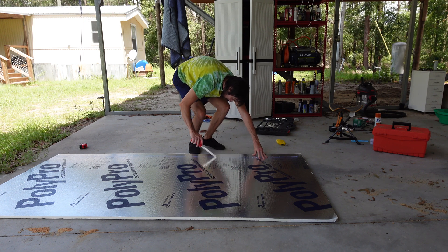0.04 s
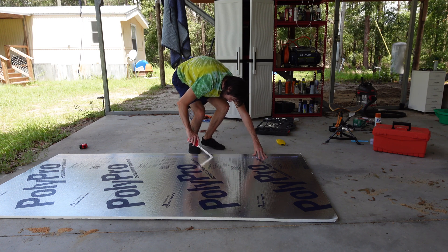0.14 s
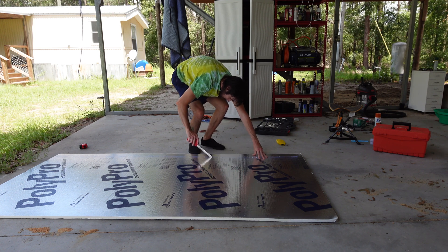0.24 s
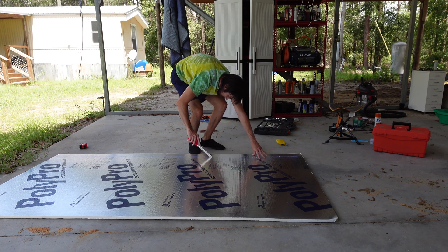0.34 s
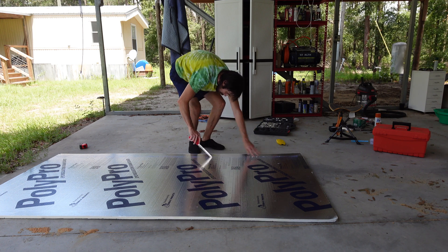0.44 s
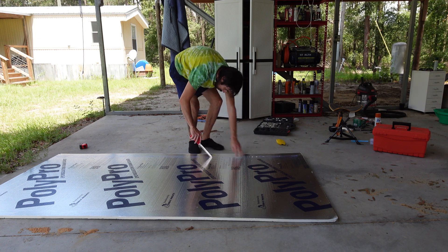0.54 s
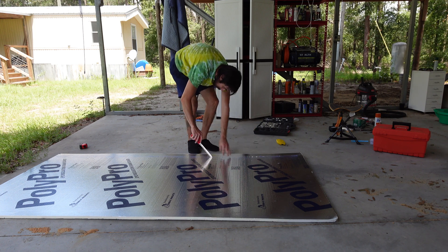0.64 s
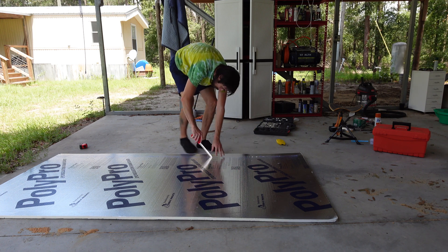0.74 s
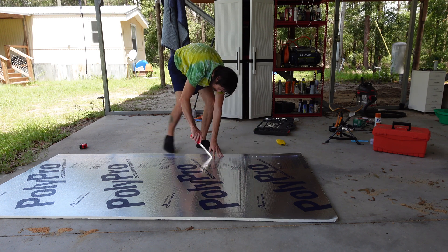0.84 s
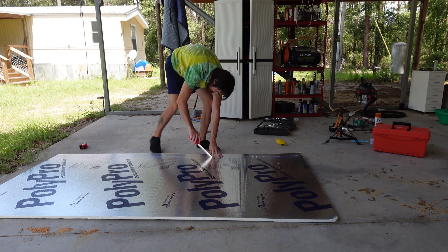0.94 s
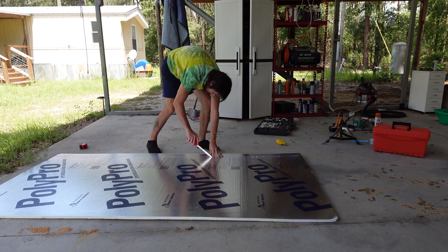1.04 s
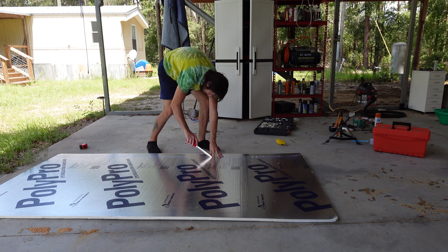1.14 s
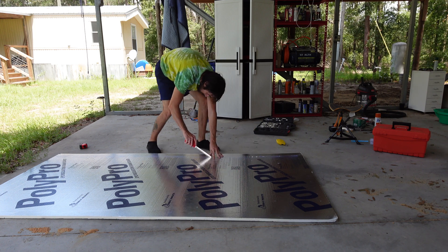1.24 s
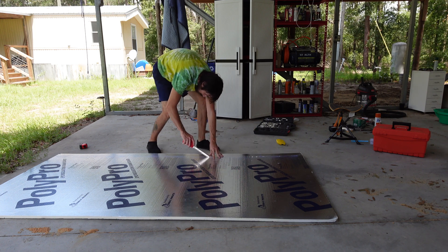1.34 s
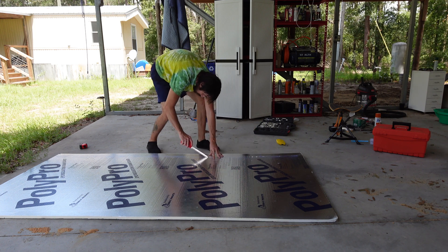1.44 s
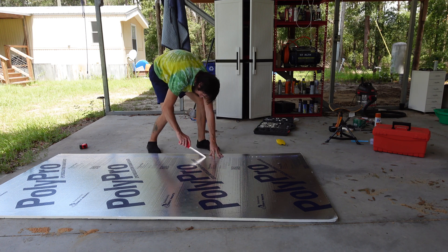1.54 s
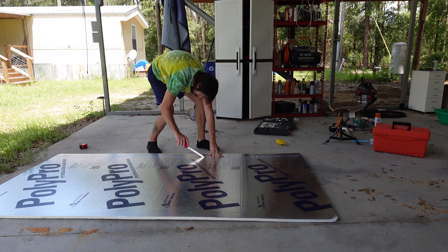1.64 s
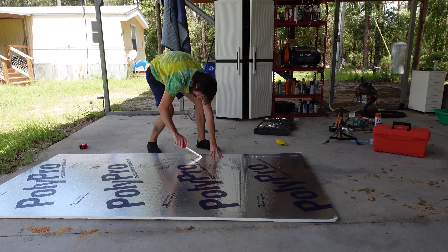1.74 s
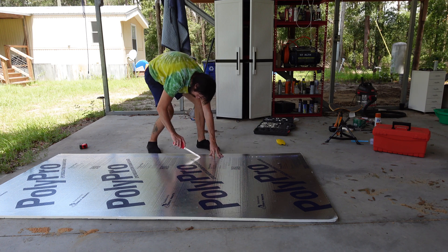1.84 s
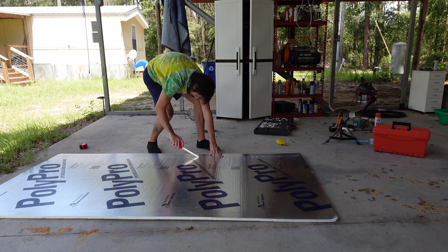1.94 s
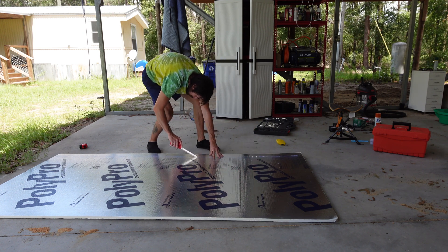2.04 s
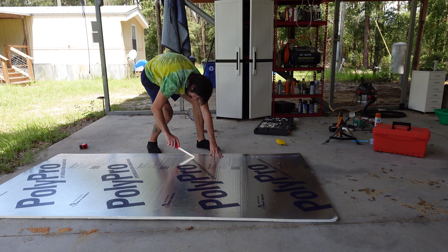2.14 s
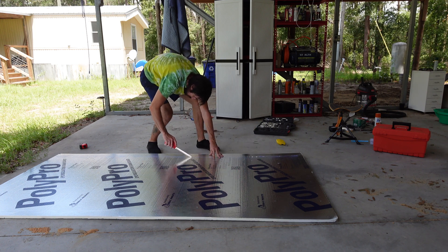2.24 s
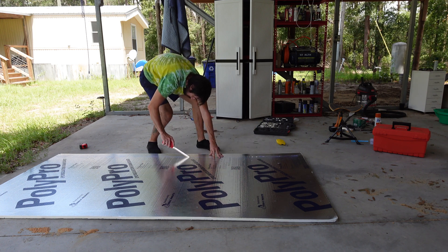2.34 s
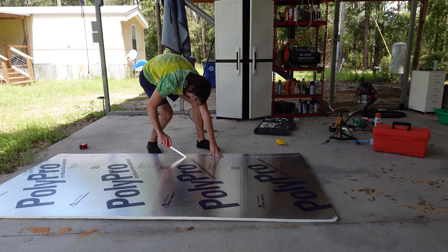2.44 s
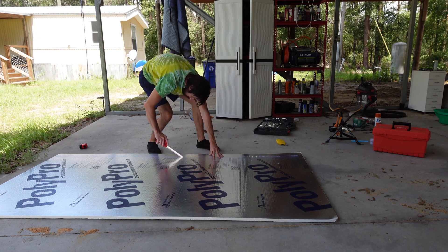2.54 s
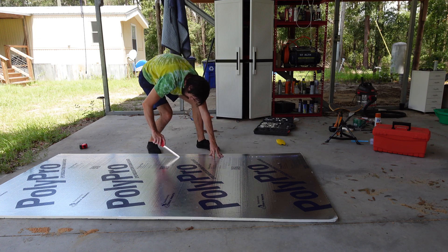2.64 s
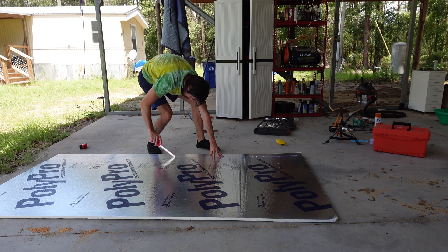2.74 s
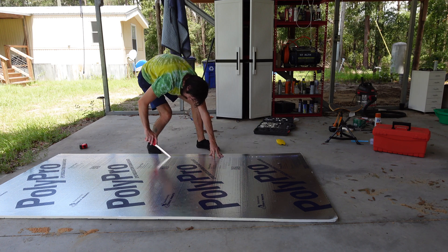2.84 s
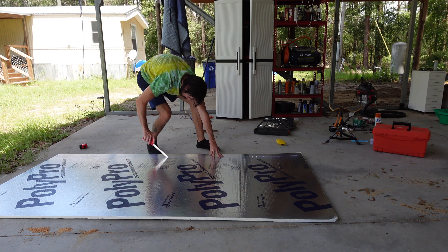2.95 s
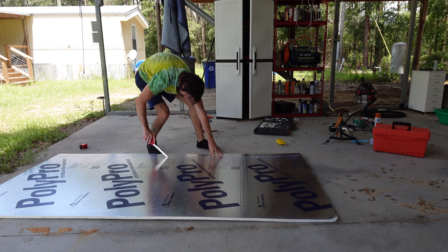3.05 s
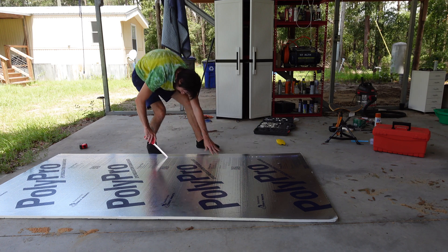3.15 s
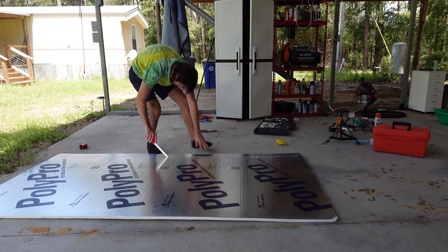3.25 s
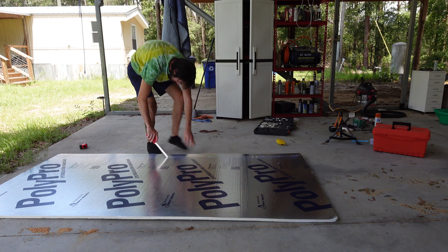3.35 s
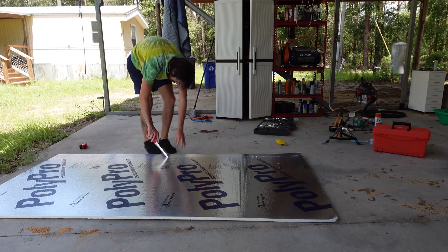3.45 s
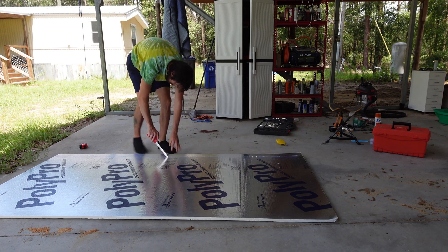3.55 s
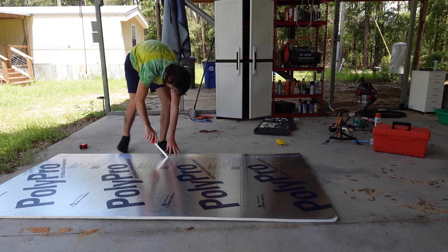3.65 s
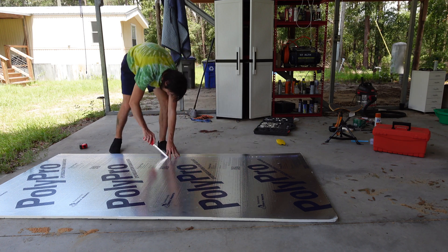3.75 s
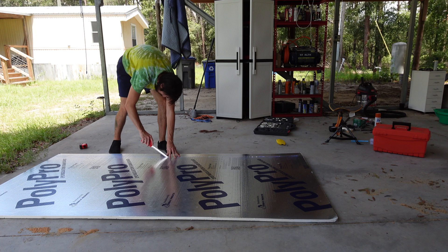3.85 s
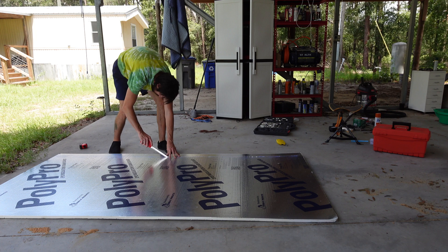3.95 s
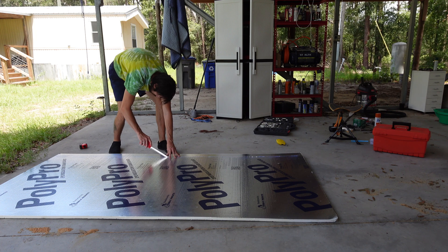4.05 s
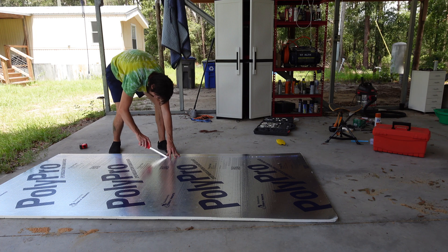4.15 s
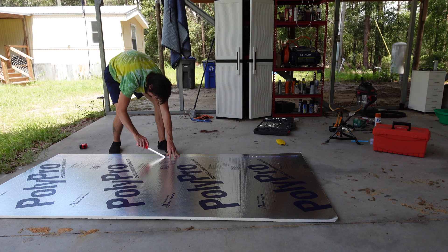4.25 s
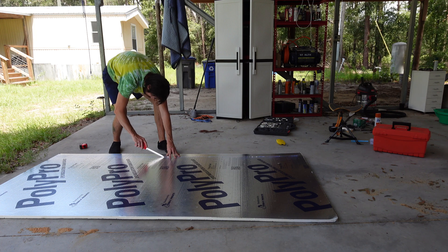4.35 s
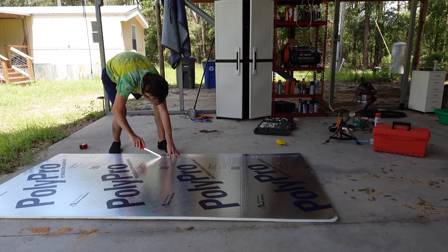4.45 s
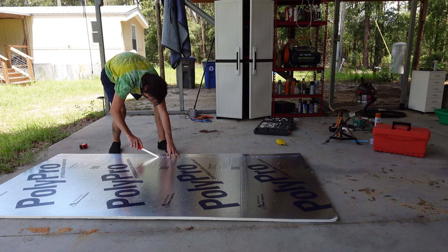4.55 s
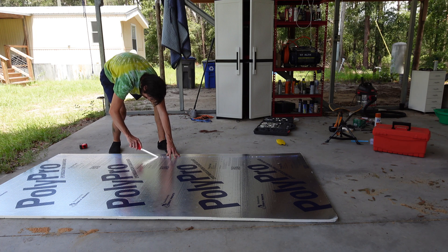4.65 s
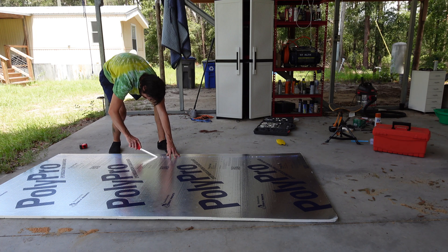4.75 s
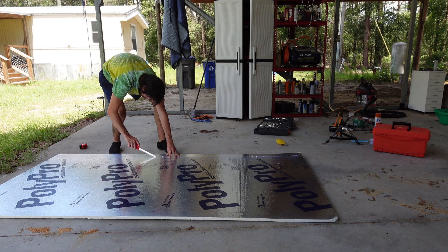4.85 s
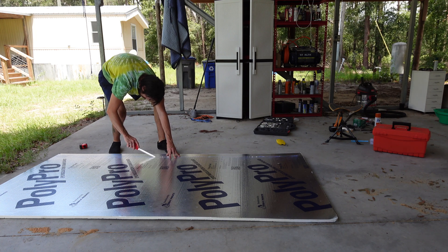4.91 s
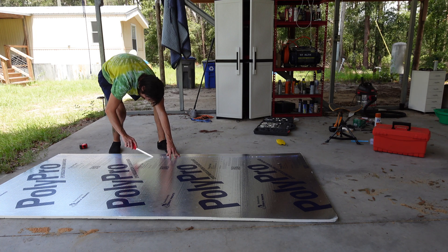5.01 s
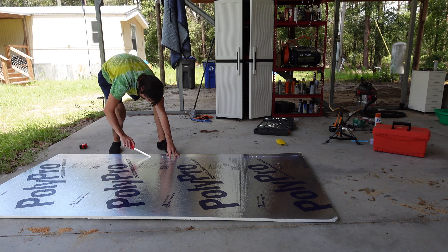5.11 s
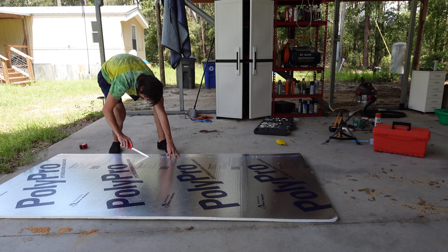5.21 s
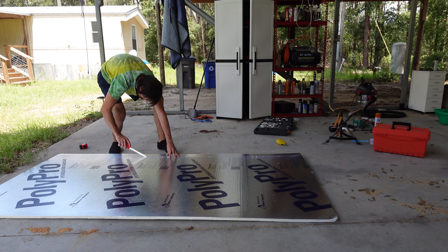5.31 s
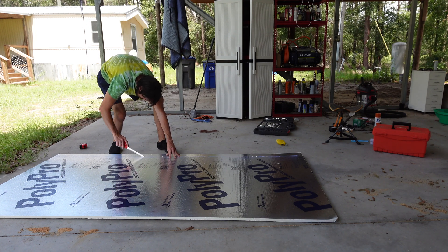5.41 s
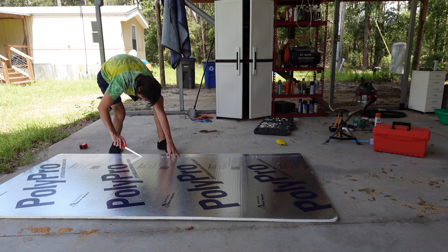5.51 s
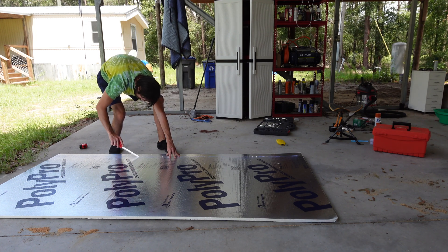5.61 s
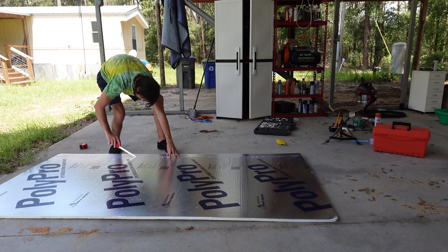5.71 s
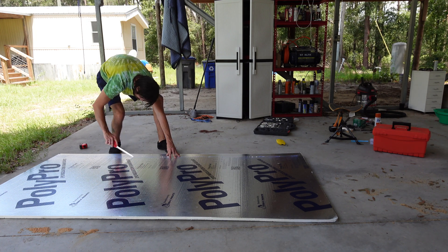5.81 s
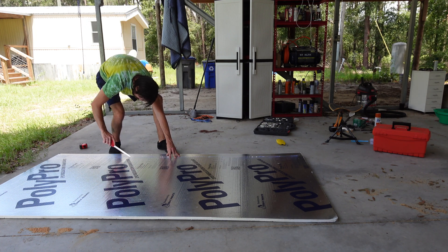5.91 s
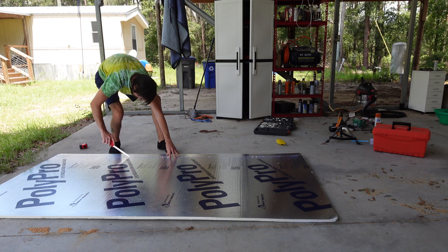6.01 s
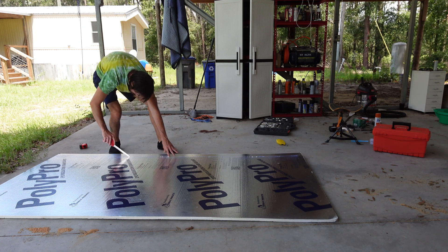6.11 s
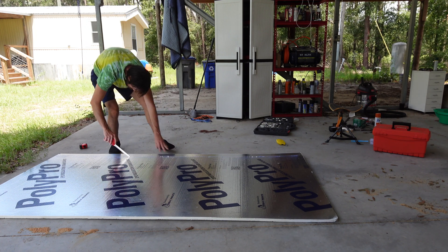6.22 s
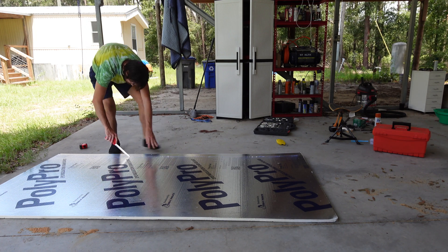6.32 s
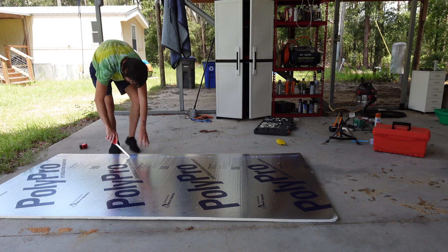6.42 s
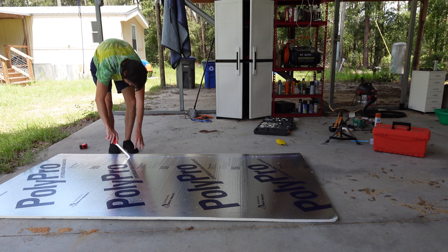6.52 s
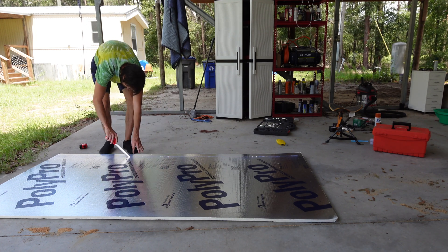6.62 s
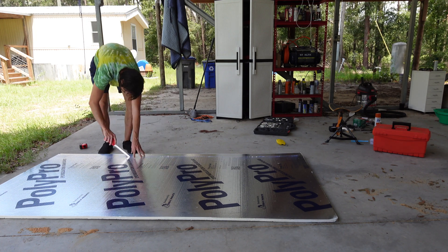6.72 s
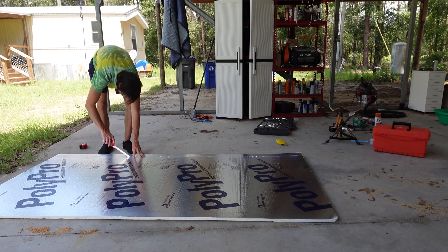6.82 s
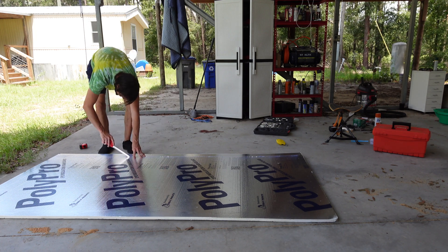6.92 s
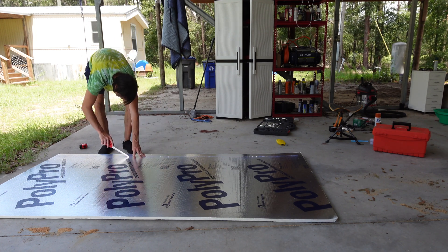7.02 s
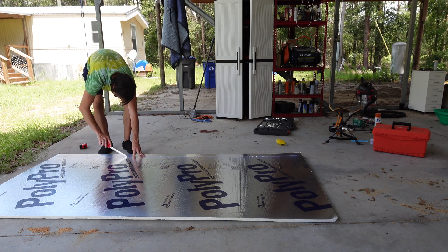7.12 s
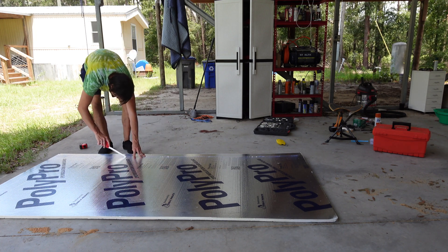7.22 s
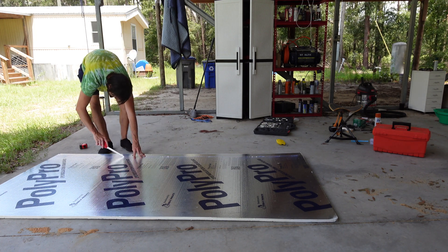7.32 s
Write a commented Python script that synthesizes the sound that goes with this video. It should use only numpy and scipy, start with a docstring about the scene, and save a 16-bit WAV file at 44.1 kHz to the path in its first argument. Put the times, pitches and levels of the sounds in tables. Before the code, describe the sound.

In an open garage, a few metres from the microphone, a blade already mid-cut rips briefly through foil-faced foam board. Gritty shoe scuffs follow, then a long raspy stroke, a pause with soft taps and scuffs, two close strokes, more shuffling, and a last short cut. Foil crackles and sharp little snaps pepper the cuts; tree hiss and insects continue behind.

```python
"""A blade is heard mid-cut in foil-faced foam board on an open garage's floor, first of five strokes, a few metres off.
Fractures make the facing fizz, the foam rasp and the board drum: more with pressure, drumming also as each cut lengthens.
Snags are short noise bursts; foil crackles, clothes-like dull rustle, soft taps and gritty shoe scuffs are shaped noise.
Outside, filtered noise makes low air, hissing trees and insects whose chorus dips, then slowly swells."""
import sys
import numpy as np
from scipy import signal
from scipy.fft import rfft, irfft, next_fast_len
from scipy.io import wavfile
from scipy.ndimage import uniform_filter1d, map_coordinates

SR = 44100
rng = np.random.default_rng(int(sys.argv[2]) if len(sys.argv) > 2 else 0)


def wav_out(sig):
    """Save sig, one row per channel (or a flat mono array), as 16-bit PCM at SR to the path in sys.argv[1]."""
    wavfile.write(sys.argv[1], SR, np.round(np.clip(np.atleast_2d(sig).T, -1, 1) * 32767).astype(np.int16))


N = 325017


def amp(db):
    """Decibels to gain."""
    return 10 ** (np.asarray(db) / 20)


def unit(x):
    """x at rms 1."""
    return x / np.sqrt(np.mean(x ** 2) + 1e-20)


def noise(size=N):
    """White Gaussian noise."""
    return rng.standard_normal(size)


def along(points, hz):
    """(frequency [Hz], value) points read on a log frequency axis."""
    f, v = np.transpose(points)
    return np.interp(np.log(hz + 1), np.log(f), v)


def bell(hz, centre_hz, width_hz):
    """A resonance's bump, 1 at its centre."""
    return 1 / (1 + (2 * (hz - centre_hz) / width_hz) ** 2)


def curve(points):
    """(time [s], value) points, interpolated per sample."""
    s, v = np.transpose(points)
    return np.interp(np.arange(N) / SR, s, v)


def wobble(knots_per_s):
    """A smooth random curve."""
    knots = noise(int(N * knots_per_s / SR) + 4)
    return map_coordinates(knots, [np.arange(N) * knots_per_s / SR], order=2)


def swells(rows):
    """Gain of summed Gaussian swells, rows (middle [s], length [s], level [dB])."""
    t = np.arange(N) / SR
    return sum(amp(db) * np.exp(-2 * ((t - middle) / length) ** 2) for middle, length, db in rows)


def filtered(x, response):
    """x times a gain that depends on frequency."""
    m = next_fast_len(len(x) + 8192)
    return irfft(rfft(x, m) * response(np.fft.rfftfreq(m, 1 / SR)), m)[:len(x)]


def coloured(x, spectrum):
    """x given a spectrum, at rms 1."""
    return unit(filtered(x, lambda hz: amp(along(spectrum, hz))))


def gliding(x, centre_hz, lift_db, width_hz):
    """x through one resonance whose centre and lift are given per sample."""
    hz, when, z = signal.stft(x, SR, nperseg=256)
    at = np.minimum(np.round(when * SR).astype(int), N - 1)
    gain = amp(lift_db[at] * bell(hz[:, None], centre_hz[at], width_hz))
    return signal.istft(z * gain, nperseg=256)[1][:N]


def patchy(x, depth_db, size=(3, 50)):
    """Narrow bands of x drift up and down on their own; size is smoothing in (bins, frames)."""
    z = signal.stft(x, nperseg=512)[2]
    field = uniform_filter1d(noise(z.shape), size[0], 0)
    field = uniform_filter1d(field, size[1], 1)
    return signal.istft(z * amp(depth_db * unit(field)), nperseg=512)[1][:N]


def grit(rate_per_s, spread_db, share, smear_s, size=N):
    """Tiny fractures of uneven strength over smooth friction noise; share is the fractures' part of the power."""
    struck = rng.random(size) < rate_per_s / SR
    fractures = struck * amp(spread_db * np.minimum(noise(size), 2))
    # each fracture is a noise burst of decaying power
    power = signal.lfilter([1], [1, -np.exp(-1 / (smear_s * SR))], fractures ** 2)
    return np.sqrt(share * power / power.mean() + 1 - share) * noise(size)


def add(track, s, sound):
    """Mix a sound into the track at s seconds."""
    room = track[max(round(s * SR), 0):][:len(sound)]
    room += sound[:len(room)]


# blade per stroke: (edge pitch at start [Hz], edge pitch at end [Hz], facing fizz in a firm cut [dB],
# foam resonance lift [dB], board drumming at the end of a firm cut [dB])
STROKE_SETTINGS = [(12300, 12600, -34, 3, -45.5), (10700, 13300, -33, 4, -41.3), (12800, 9400, -30, 2, -52),
                   (12000, 16500, -35.5, -0.5, -42.5), (14300, 17000, -36.5, -1, -67)]
# blade pressure, one curve per stroke: (time [s], level over a firm cut [dB])
STROKE_PRESSURE = [
    [(0, -4.5), (.035, -6), (.058, -1.5), (.19, 3.5), (.262, -2.5)],
    [(1.29, -17), (1.33, -10), (1.41, -4.5), (1.51, -8), (1.57, -3.5), (1.65, -5.5), (1.79, -3),
     (2.115, -6.5), (2.155, 0.7), (2.72, 0.5), (2.8, 3), (3.008, 0.8)],
    [(4.175, -20), (4.25, -16), (4.3, -6), (4.44, -9.5), (4.55, 0), (4.665, -4)],
    [(4.78, -7.5), (5.04, -3), (5.14, 1), (5.4, -0.3), (5.82, .2), (5.9, -4), (5.99, 2), (6.06, -6.5)],
    [(7.12, -6.5), (7.22, 0.5), (7.27, -3.5), (7.37, -7)],
]
ATTACK_S, RELEASE_S = 0.025, 0.061  # blade meets board; fall of 20 dB as it lifts
FIZZ_GROWS_DB_PER_DB = 0.69  # below 1: the facing fizzes even under a light touch
DRUM_DB_PER_S = 12.5  # the board loosens as the cut lengthens
EDGE_GLIDE_POWER = 1.9  # of stroke progress


def strokes():
    """Hand per sample: contact 0-1, pressure dB, edge Hz, fizz dB, foam resonance dB, drumming dB."""
    t = np.arange(N) / SR
    hand = np.zeros((6, N))
    for pressure, settings in zip(STROKE_PRESSURE, STROKE_SETTINGS):
        first_hz, last_hz, firm_fizz_db, cut_db, end_drum_db = settings
        start, end = pressure[0][0], pressure[-1][0]
        landing = np.clip((t - start) / ATTACK_S + 1, 0, 1)
        contact = landing * amp(-20 * np.maximum(t - end, 0) / RELEASE_S)
        pressure_db = curve(pressure)
        # the blade tilts as the arm draws it in, so its edge pitch glides
        progress = np.clip((t - start) / (end - start), 0, 1)
        edge_hz = first_hz + (last_hz - first_hz) * progress ** EDGE_GLIDE_POWER
        fizz_db = firm_fizz_db + FIZZ_GROWS_DB_PER_DB * pressure_db
        drumming_db = end_drum_db - DRUM_DB_PER_S * np.maximum(end - t, 0)
        stroke = [contact, pressure_db, edge_hz, fizz_db, cut_db * contact, drumming_db]
        hand = np.where(t > start - ATTACK_S, stroke, hand)
    return hand


# spectra of facing, cut foam and drumming board: (frequency [Hz], relative density [dB])
FACING_SPECTRUM = [(3000, -45), (5000, -8), (7000, -8.5), (10000, 0.5), (13000, 1.5), (16000, 1)]
FOAM_SPECTRUM = [(300, -72), (600, -28.5), (750, -22), (900, -3), (1200, -0.5), (1450, -5), (1900, -1.5),
                 (2250, -1), (3000, 0), (4200, 0.5), (5600, -5.5), (9000, -10), (16000, -20)]
DRUM_SPECTRUM = [(30, -53), (100, -11.5), (200, -10), (280, 2.5), (350, 6), (470, 3.5), (590, -7), (750, 1),
                 (1100, -11.5), (2500, -48)]
# board resonances under the blade: (centre [Hz], width [Hz], lift [dB])
BOARD_RESONANCES = [(363, 210, 0.5), (884, 100, 1.5), (1040, 140, 0), (1890, 105, 6.5), (2800, 250, 0.5)]
FOAM_DB = -33  # rasp in a firm cut
EDGE_LIFT_DB, EDGE_GROWS_DB_PER_DB, EDGE_WANDER_HZ = 5.5, 0.45, 170  # edge sings in a firm cut
CUT_HZ, CUT_SAG_HZ_PER_DB = 3690, 90  # foam resonance drops as the cut deepens


def blade(contact, pressure_db, edge_hz, fizz_db, cut_db, drumming_db):
    """One stream of fractures makes the facing fizz, the foam rasp and the whole board drum."""
    # the edge sticks and slips unevenly, with a slight chatter near 40 Hz
    chatter_db = np.sin(2 * np.pi * np.cumsum(40 + 7 * wobble(6)) / SR)
    stick_slip_db = 0.55 * wobble(90) + chatter_db
    tearing = grit(rate_per_s=1200, spread_db=6, share=0.44, smear_s=0.00085) * amp(stick_slip_db)

    singing_db = np.maximum(EDGE_LIFT_DB + EDGE_GROWS_DB_PER_DB * pressure_db, 0) * contact
    wandering_hz = edge_hz + EDGE_WANDER_HZ * wobble(11)
    fizz = gliding(coloured(tearing, FACING_SPECTRUM), wandering_hz, singing_db, width_hz=1600)
    fizz = unit(patchy(fizz, depth_db=0.8) * amp(0.9 * wobble(75)))

    def resonances(hz):
        return amp(sum(db * bell(hz, centre, width) for centre, width, db in BOARD_RESONANCES))

    body = filtered(tearing, resonances)
    foam_hz = CUT_HZ - CUT_SAG_HZ_PER_DB * pressure_db
    rasp = gliding(coloured(body, FOAM_SPECTRUM), foam_hz, cut_db, width_hz=790)
    rasp = unit(patchy(rasp, depth_db=1.2))
    drumming = amp(drumming_db) * coloured(body, DRUM_SPECTRUM)
    # the hand is never quite steady
    tremor_db = 0.5 * wobble(22.05)
    foam = amp(pressure_db) * (amp(FOAM_DB) * rasp + drumming)
    return contact * amp(tremor_db) * (amp(fizz_db) * fizz + foam)


# a hand leans on the foil: (middle [s], length [s], level [dB])
HAND_LEANS = [(.5, 0.38, -45.5), (1.06, .07, -47), (3.93, .16, -37.5), (5.25, 0.66, -33.5), (6.2, .3, -46),
              (6.85, 0.56, -40)]
CRINKLE_DB = -52  # beside a firm cut


def crinkle(drag):
    """Sparse bright crackles of the foil facing, beside the blade and under a leaning hand."""
    crackles = grit(rate_per_s=140, spread_db=8, share=0.98, smear_s=0.0009)
    gain = np.hypot(amp(CRINKLE_DB) * drag, swells(HAND_LEANS))
    return gain * coloured(crackles, FACING_SPECTRUM)


# spectra of insects, air and trees: (frequency [Hz], relative density [dB])
INSECT_SPECTRUM = [(1200, -33), (2000, -14), (2500, 3.5), (3200, -2.5), (4200, 4), (5300, -9), (6900, 2),
                   (8000, 2.5), (9300, 3), (11000, -5), (16000, -22)]
AIR_SPECTRUM = [(25, -58), (60, -34), (120, -13), (190, 1.5), (260, 0), (350, 2), (480, -2.5), (600, -16.5),
                (730, -10), (900, 1.5), (1500, -6.5), (4000, -17)]
TREE_SPECTRUM = [(600, -25), (950, -9.5), (1500, -6.5), (2100, -3.5), (2600, 1.5), (4000, 1), (5400, 0.5),
                 (7000, 1), (9000, -4.5), (11000, -9.5), (16000, -12)]
# insect chorus, then nearer insects: (time [s], level [dB])
CHORUS_LEVEL = [(0, -42), (1, -53.5), (2, -45.5), (3.35, -41.5), (3.9, -36), (5, -35), (6.3, -34),
                (7.37, -35.5)]
NEAR_LEVEL = [(0, -62), (3, -40.5), (4, -45), (5, -50), (6.3, -43), (7.37, -41)]
# nearer insects, one narrow band each: (centre [Hz], width [Hz], level relative to NEAR_LEVEL [dB])
NEAR_INSECTS = [(4100, 250, -4.5), (2440, 74, -13.5), (6500, 410, -4.5), (7700, 160, -10), (9140, 630, -8)]


def outdoors():
    """A low murmur of air, a steady hiss from the trees and a swelling chorus of insects."""
    air = amp(-52.5 + 0.0) * coloured(noise(), AIR_SPECTRUM) * amp(0.46 * wobble(3.58))
    trees = amp(-38.5) * coloured(noise(), TREE_SPECTRUM)
    chorus = unit(patchy(coloured(noise(), INSECT_SPECTRUM), depth_db=2.5, size=(2, 300)))
    chorus = chorus * amp(curve(CHORUS_LEVEL) + 0.091 * wobble(3.7))
    buzz = np.zeros(N)
    for centre, width, db in NEAR_INSECTS:
        band = filtered(noise(), lambda hz: bell(hz, centre, width))
        rattle = amp(3.5 * wobble(90))  # uneven pace
        buzz += amp(db) * unit(band * rattle)
    return air + trees + chorus + amp(curve(NEAR_LEVEL)) * buzz


# rustle spectrum: (frequency [Hz], relative density [dB])
RUSTLE_SPECTRUM = [(30, -48), (70, -16.5), (120, -13.5), (190, -3), (260, 0), (350, -2), (480, -10.5),
                   (700, -21), (2000, -21)]
# the worker shifts weight, and at 6.15 s the board settles: (middle [s], length [s], level [dB])
WEIGHT_SHIFTS = [(.3, 0.42, -53), (1, 0.25, -56), (3.17, 0.17, -52.5), (3.55, 0.6, -53), (6.15, 0.088, -51),
                 (6.45, 0.81, -60), (7.35, 0.25, -55)]
# soft taps of fingers and heels: (time [s], peak [dB], centre [Hz])
SOFT_TAPS = [(1.721, -29, 1400), (3.118, -30, 1500), (3.473, -30, 1100), (6.079, -27, 1500)]
STIR_DB = -60.5  # constant slight rustle


def movement(tap_t60_s=0.069):
    """The worker's weight shifts and the board settles with a dull rustle, plus a few soft taps, decaying band-
    passed noise."""
    out = (amp(STIR_DB) + swells(WEIGHT_SHIFTS)) * coloured(noise(), RUSTLE_SPECTRUM)
    t = np.arange(SR // 8) / SR
    for s, db, centre_hz in SOFT_TAPS:
        band_hz = [0.6 * centre_hz, 1.4 * centre_hz]
        resonance = signal.butter(2, band_hz, "bandpass", fs=SR, output="sos")
        tap = signal.sosfilt(resonance, noise(len(t)) * amp(-60 * t / tap_t60_s))
        add(out, s, amp(db) * tap / np.abs(tap).max())
    return out


# the facing snags hard and snaps free: (time [s], relative level [dB], treble tilt [dB per octave])
HARD_SNAGS = [(0.057, -8.5, 3), (.145, -14, -12), (.219, -12, -3), (.394, -21, -2), (1.532, -10, 2),
              (1.543, -17, 3), (1.559, -10.5, 1.5), (1.828, -14, 5), (2.607, -13, 8), (2.836, -19, 3),
              (2.887, -10, -3), (4.185, -17, 2), (4.408, -15, 6), (4.521, -12, 4), (4.5365, -8.5, 2.5),
              (4.7865, -11.5, 4), (5.058, -12, 4), (5.1248, -4.5, 6), (5.368, -14, 8), (5.775, -18, -3),
              (5.94, -16, -5), (5.954, -13, 6), (6.078, -18, 0), (6.879, -12.5, -2.5), (7.197, -7.5, 3.5)]
# snap spectrum: (frequency [Hz], relative density [dB])
SNAP_SPECTRUM = [(60, -70), (300, -31), (700, -41), (1500, 0), (2500, -4), (3800, 9), (6000, -0.5),
                 (9000, -4.5), (12000, 1.5), (16000, -4.5)]
CRACK_T60_S, RATTLE_T60_S, RATTLE_DB = 0.005, 0.018, -13
# lesser snags in a firm cut: relative level, its scatter, treble tilt
SNAG_DB, SNAG_SPREAD_DB, SNAG_TILT_DB_PER_OCT = -29, 3, 1


def ticks(drag, size=1024, count=30):
    """Each snag lets go with a crack and a very short rattle of the facing; lesser ones scale with drag."""
    out, t = np.zeros(N), np.arange(-size, size) / SR
    crack = amp(-60 * abs(t) / CRACK_T60_S)
    rattle = amp(RATTLE_DB - 60 * abs(t) / RATTLE_T60_S)
    decay = (t >= 0) * (crack + rattle)
    moments = rng.integers(N, size=count)
    drag_db = 20 * np.log10(drag[moments] + 1e-9)
    lesser_db = SNAG_DB + SNAG_SPREAD_DB * noise(count) + drag_db
    lesser = [(s, db, SNAG_TILT_DB_PER_OCT) for s, db in zip(moments / SR, lesser_db)]
    for s, db, tilt_db in [*HARD_SNAGS, *lesser]:
        def colour(hz):
            return amp(along(SNAP_SPECTRUM, hz) + tilt_db * np.log2((hz + 100) / 5000))

        snap = filtered(decay * noise(len(t)), colour)
        add(out, s + t[0], amp(db + 11) * snap / np.linalg.norm(snap))
    return out


# shoes sliding on concrete, and at 6.854 s the blade set down: (start [s], length [s], level [dB], # centre
# [Hz], resonance lift [dB], treble tilt [dB per octave])
SHOE_SCUFFS = [(0.616, 0.074, -25, 3830, 9, 1.5), (0.651, 0.082, -27.5, 2500, 14.5, 0),
               (0.73, 0.057, -26.5, 1190, 4, 1), (1.001, 0.038, -40.5, 1700, 8, -2),
               (3.05, 0.11, -39.5, 1200, -1, -4.5), (3.187, 0.039, -31, 3400, 7, 2.5),
               (3.481, 0.042, -27, 3120, 8.5, 4), (3.548, 0.028, -29.5, 2880, 2, 1),
               (3.748, 0.15, -38.5, 1390, 3.5, -1), (4.495, 0.085, -29.5, 4320, 3, 5),
               (6.18, .033, -32, 1450, 9, -1.5), (6.486, 0.055, -27.3, 2480, 1.5, 0),
               (6.58, 0.037, -31, 1950, 7, -2.5), (6.706, 0.04, -30.5, 2400, 5.5, -2),
               (6.854, 0.057, -32, 4050, 7, 1.5), (7.313, 0.051, -24.5, 3140, 7.5, -1)]
# sole spectrum: (frequency [Hz], relative density [dB])
SOLE_SPECTRUM = [(40, -60), (150, -31), (400, -13), (680, -19.5), (900, -4.5), (1500, -3), (2500, 0.5),
                 (4200, 0.5), (6000, -1.5), (8500, -4.5), (11000, -8.5), (16000, -14)]
SCUFF_RISE_SHARE, SCUFF_FALL_S = 0.61, 0.066  # sole gathers speed over this share; fall of 16 dB


def shoes():
    """A sole rolls sand over concrete, or the blade is set down: a gritty swell with one resonance."""
    out, t = np.zeros(N), np.arange(SR // 2) / SR
    for s, length, db, centre_hz, lift_db, tilt_db in SHOE_SCUFFS:
        def colour(hz):
            resonance_db = lift_db * bell(hz, centre_hz, 0.27 * centre_hz)
            treble_db = tilt_db * np.log2((hz + 1000) / 4000)
            return amp(along(SOLE_SPECTRUM, hz) + resonance_db + treble_db)

        sand = grit(rate_per_s=1100, spread_db=5, share=0.45, smear_s=0.0007, size=len(t))
        rise = np.clip(t / (SCUFF_RISE_SHARE * length), 0, 1)
        fall = amp(-16 * np.maximum(t - length, 0) / SCUFF_FALL_S)
        add(out, s, amp(db) * rise * fall * unit(filtered(sand, colour)))
    return out


# garage reverberation: (frequency [Hz], T60 [s])
GARAGE_T60 = [(200, 0.36), (2000, 0.46), (12000, 0.083)]


def garage(x):
    """Roof and walls answer briefly after 5 ms, a noise tail with its top treble dying first."""
    hz, t, z = signal.stft(noise(SR // 2), SR, nperseg=256)
    decay = amp(-60 * t / along(GARAGE_T60, hz)[:, None])
    tail = signal.istft(z * decay, SR, nperseg=256)[1]
    delayed = np.pad(x, (round(0.005 * SR), 0))
    return signal.fftconvolve(delayed, tail / np.linalg.norm(tail))[:N]


def scene():
    """The work on the floor, its room sound and the outdoors, alike in both channels."""
    contact, pressure_db, edge_hz, fizz_db, cut_db, drumming_db = strokes()
    drag = contact * amp(FIZZ_GROWS_DB_PER_DB * pressure_db)  # pull on the facing, 1 in a firm cut
    work = blade(contact, pressure_db, edge_hz, fizz_db, cut_db, drumming_db)
    work = work + crinkle(drag) + movement() + ticks(drag) + shoes()
    # the echoes change as the worker moves along the board
    turn = 2 * np.pi * np.arange(N) / N
    echoes = np.cos(turn) * garage(work) + np.sin(turn) * garage(work)
    mono = work + amp(-8.5) * echoes + outdoors()
    return np.array([mono, mono])


def record(dry):
    """Thins the deepest bass and keeps nothing from the band limit up."""
    low_cut_hz, top_hz = 55, 15760

    def response(hz):
        return hz ** 2 / np.hypot(hz ** 2, low_cut_hz ** 2) * (hz < top_hz)

    return np.array([filtered(channel, response) for channel in dry])


dry = scene()
out = record(dry)
wav_out(out)
```